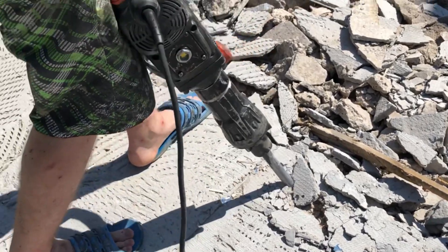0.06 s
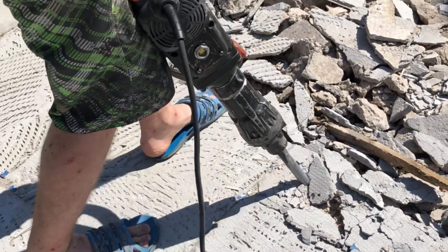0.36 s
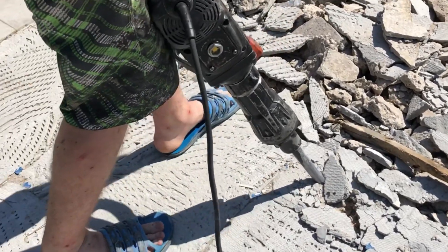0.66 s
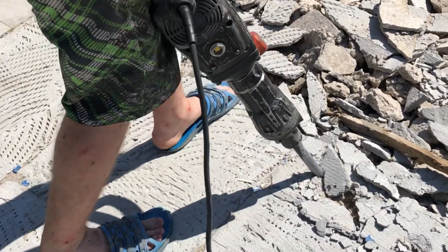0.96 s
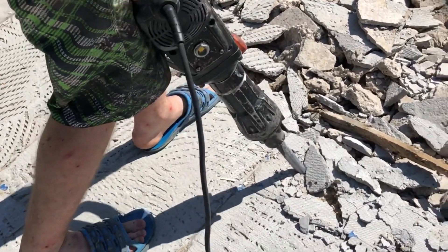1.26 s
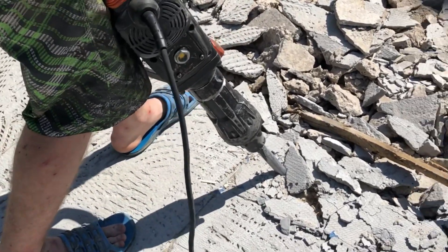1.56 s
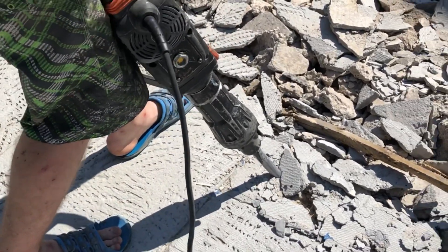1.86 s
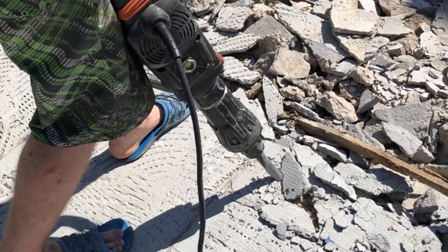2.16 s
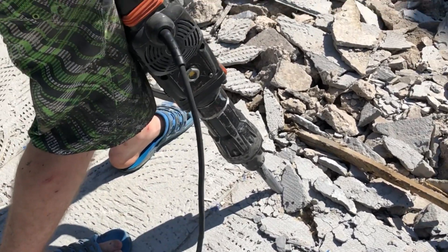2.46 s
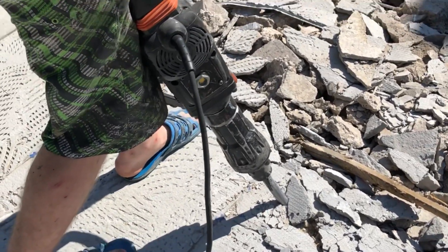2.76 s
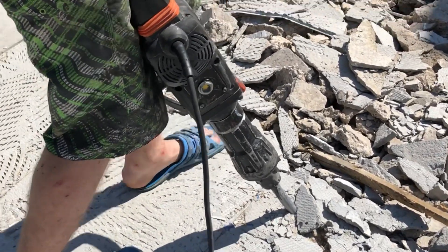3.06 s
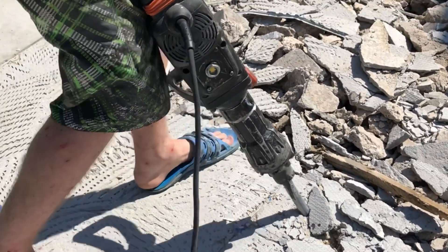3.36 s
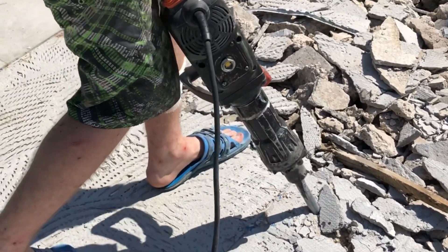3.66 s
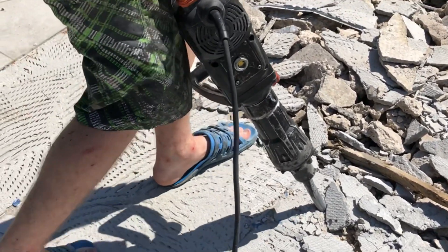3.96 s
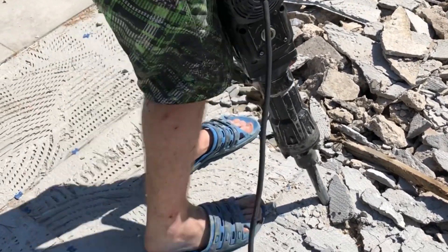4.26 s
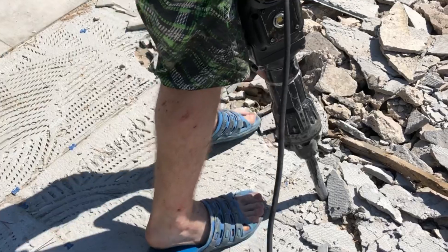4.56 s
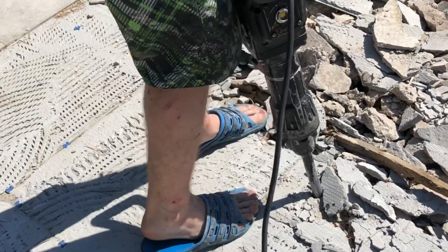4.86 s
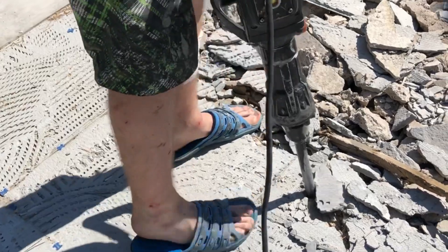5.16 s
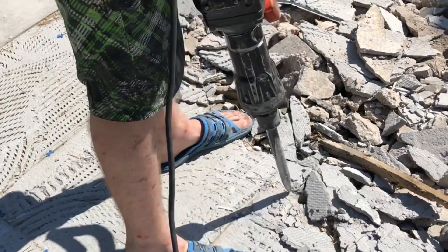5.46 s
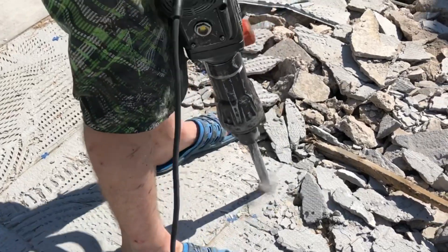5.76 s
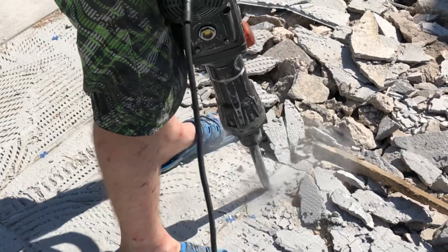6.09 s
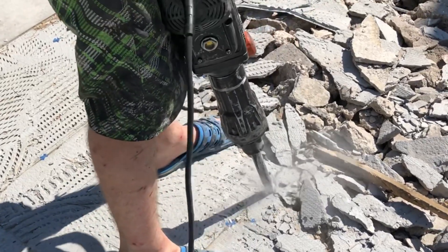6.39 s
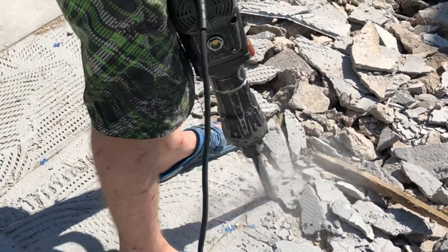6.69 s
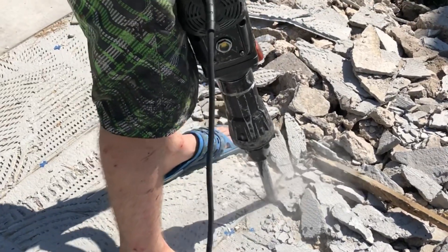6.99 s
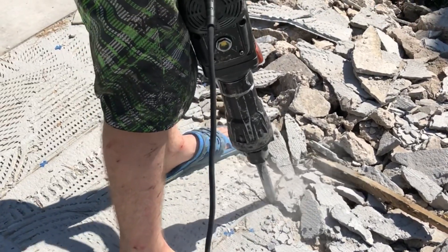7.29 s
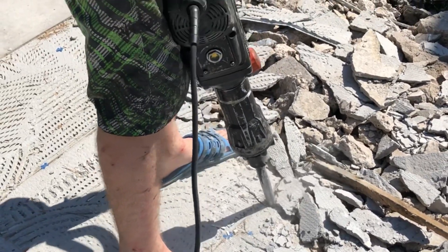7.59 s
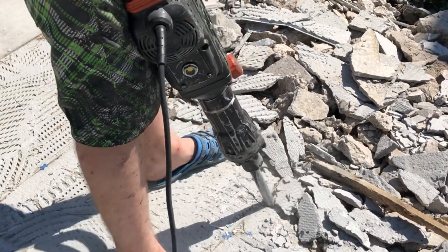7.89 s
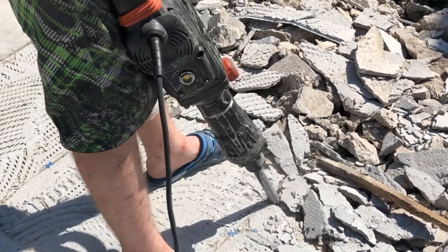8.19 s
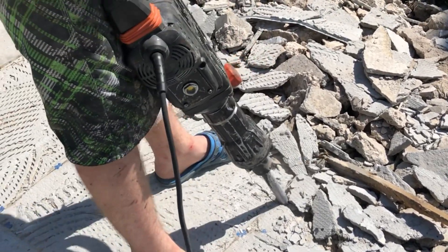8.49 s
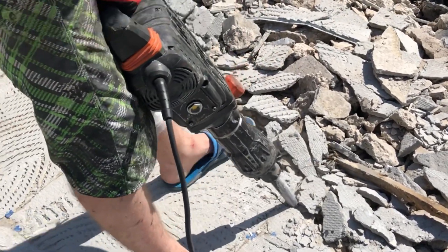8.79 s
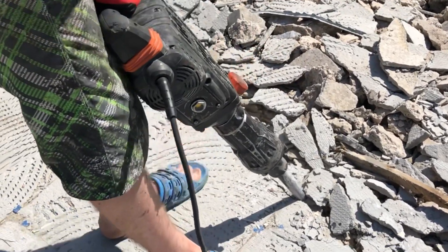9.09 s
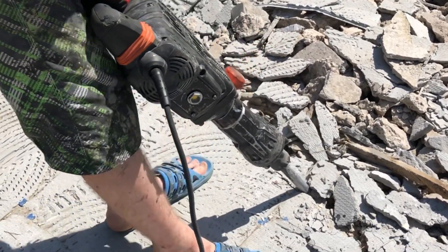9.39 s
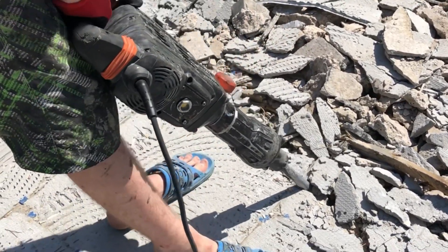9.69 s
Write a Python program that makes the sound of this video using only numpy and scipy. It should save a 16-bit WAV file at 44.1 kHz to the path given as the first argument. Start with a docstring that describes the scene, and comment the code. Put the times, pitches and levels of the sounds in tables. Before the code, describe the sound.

An electric demolition hammer pounds concrete close by, briefly runs free with a whirring motor, then resumes its rapid hammering.

```python
"""An electric demolition hammer chisels a concrete slab outdoors, close by. From the start, each blow
cracks on the concrete and thuds through tool and slab; the steel chisel rings when it rattles loose.
After about 4 seconds the tool is lifted and runs free, its fan roaring and its gears whining.
Near 5.7 seconds it starts on a new spot, skids, then bites in with a dry clack at each blow.
Towards the end a piece of concrete works free and the knocking turns hollow."""
import sys
import numpy as np
from scipy import signal
from scipy.fft import rfft, irfft, next_fast_len
from scipy.io import wavfile
from scipy.ndimage import uniform_filter1d, map_coordinates

SR = 44100
rng = np.random.default_rng(int(sys.argv[2]) if len(sys.argv) > 2 else 0)


def unload_wav(signal):
    """Save mono or channel-first audio to the path in sys.argv[1] as 16-bit WAV at rate SR, clipped to [-1, 1]."""
    wavfile.write(
        sys.argv[1],
        SR,
        np.round(np.clip(np.atleast_2d(signal).T, -1, 1) * 32767).astype(np.int16),
    )


N = 438354

# pace of the two spells of hammering, which sags under load: (time [s], pace [blows/s])
FIRST_SPELL = [(0.008, 24.708), (0.45, 23.078), (1.04, 22.991), (1.22, 24.499), (2.29, 23.901),
               (2.54, 24.361), (3.42, 23.408), (3.76, 27.247), (4.1567, 27.559)]
SECOND_SPELL = [(5.6837, 32.854), (6.03, 26.654), (6.56, 27.784), (6.68, 25.918), (7.09, 24.988),
                (7.39, 27.352), (7.91, 28.604), (8.61, 28.868), (9.09, 28.187), (9.9416, 28.82)]
LIFT_S, RESTART_S = FIRST_SPELL[-1][0], SECOND_SPELL[0][0]
# how the tool is held: (time [s], chisel depth [0 on top, 1 wedged in], weight leant on it [dB])
STANCE = [(0, 0, 0.5), (1.2, 0.046, -0.5), (2.7, 0.092, 2.5), (3.25, 0.036, 2.5), (3.45, 0.56, 1),
          (4.16, .55, -1), (5.68, 0.59, 4.5), (5.86, 0.16, -7), (6.1, 0.21, -2.5), (6.95, 0.17, -1.5),
          (7.3, 0.77, -1.5), (9.94, 0.7, 5)]
# tone colour of the crack with the chisel on top of the slab: (pitch [Hz], level [dB])
CRACK_ON_TOP = [(200, -16), (900, -5.5), (1400, -5), (2000, -9), (2800, -2.5), (4000, -6.5), (5200, -1.5),
                (6800, -2.5), (8100, 4), (10000, -4.5), (11300, -6.5), (12400, -2.5), (15700, -19.5)]
# tone colour of the low thump as the tool kicks back: (pitch [Hz], level [dB])
RECOIL_COLOUR = [(25, -10), (55, -5.5), (78, 4.5), (100, 3), (135, -2.5), (180, 3.5), (215, -1.5),
                 (260, -21), (600, -53)]
# strength of the crack: (on top [dB], added by wedging [dB], per dB of lean [dB], added in spell two [dB])
CRACK_STRENGTH = (-19.5, -7.5, 0.42, -0.5)


def concrete_cracks(times, low_cut_hz=330):
    """Steel hits concrete: a bright crack while the chisel is on top, shorter and fuller once wedged."""
    # tone colour of the crack with the chisel wedged in: (pitch [Hz], level [dB])
    crack_wedged = [(200, 2.5), (750, 9), (1300, 9), (1900, 5.5), (2600, 10), (3500, 6), (4300, 9),
                    (7500, 6.5), (9000, 2.5), (10300, -2.5), (12200, -1.5), (15700, -12)]
    depth = chisel_depth(times)
    on_top = crack(times, CRACK_ON_TOP, np.sqrt(1 - depth), gain_db=19.5, fade_s=.031,
                   tail_db=-13, tail_s=.18, attack_s=.0012, likeness=.44)
    wedged = crack(times, crack_wedged, np.sqrt(depth), gain_db=22.5, fade_s=.016,
                   tail_db=-30, tail_s=.12, attack_s=.0018, likeness=.7)
    bass_cut = signal.butter(2, low_cut_hz, "highpass", fs=SR, output="sos")
    return signal.sosfilt(bass_cut, on_top + wedged)


def crack(times, colour, share, gain_db, fade_s, tail_db, tail_s, attack_s, likeness, lead_s=.00021):
    """A sharp burst of noise at each blow, then a short tail of grit and ground echoes."""
    t = np.arange(SR // 8) / SR
    burst_s = fade_s * np.exp(.081 * rng.standard_normal((len(times), 1)))
    rise = 1 - np.exp(-(t / attack_s) ** 2)
    shape = rise * np.hypot(fade(t, burst_s), amp(tail_db) * fade(t, tail_s))
    # the crater changes only slowly, so each crack resembles the one before
    noise = rng.standard_normal(shape.shape)
    grit = signal.lfilter([np.sqrt(1 - likeness ** 2)], [1, -likeness], noise, axis=0)
    strength = share * amp(blow_db(times, CRACK_STRENGTH) + gain_db + rng.standard_normal(len(times)))
    bursts = placed(times - lead_s, strength[:, None] * shape * grit)
    return coloured(bursts, colour, lag_cycles=1.3)


def thud(times, recoil_gain_db=50, knock_gain_db=48, rubble_db=-36, rubble_s=.21):
    """Each blow shoves tool and slab. The slab bends, so low notes arrive late; loose rubble shakes."""
    # the slab's knock with the chisel on top, wedged in, and on a freed piece: (pitch [Hz], level [dB])
    knock_on_top = [(120, -15.5), (235, -11.5), (285, 0.5), (400, 1), (510, 6.5), (640, -6), (900, -17),
                    (2500, -47)]
    knock_wedged = [(120, -35.5), (240, -9), (290, -2), (370, -7), (490, 1), (600, -2.5), (730, 3),
                    (1400, -16), (3500, -27)]
    knock_hollow = [(150, -25), (250, -4.5), (340, 1.5), (520, 0.5), (660, -9.5), (1200, -26.5)]
    # strength of the tool's kick and the slab's knock:
    # (on top [dB], added by wedging [dB], per dB of lean [dB], added in spell two [dB])
    recoil_strength = (-29, -2, 1, -1)
    knock_strength = (-31.5, 3, 0.6, 3)
    # digging in solid concrete: (start [s], end [s], time the piece then takes to work free [s])
    solid_stretch = (7.1, 8.67, 0.88)
    solid_s, break_s, loosen_s = solid_stretch
    t = np.arange(SR // 10) / SR
    freed = np.where(times < solid_s, 1, np.clip((times - break_s) / loosen_s, 0, 1))[:, None]
    depth = chisel_depth(times)[:, None]
    push = amp(rubble_db) * fade(t, rubble_s) * rng.standard_normal((len(times), len(t)))
    push[:, 0] += 1  # the blow itself, ahead of the rubble
    recoils = push * amp(blow_db(times, recoil_strength))[:, None]
    recoils *= amp(-4 * freed * depth)  # a freed piece pushes back less
    knocks = push * amp(blow_db(times, knock_strength))[:, None]
    tool = coloured(placed(times, recoils), RECOIL_COLOUR, lag_cycles=1.082)
    blend = [(1 - depth, knock_on_top),
             (amp(2) * depth * (1 - freed), knock_wedged),
             (amp(1) * depth * freed, knock_hollow)]
    slab = sum(coloured(placed(times, knocks * share), colour, lag_cycles=.93) for share, colour in blend)
    return amp(recoil_gain_db) * tool + amp(knock_gain_db) * slab


def chisel_clack(times, fade_s=.021, pitch_spread=.011):
    """Clamped in the concrete, the chisel gives two short, dead notes at each blow."""
    # the notes as it works deeper: (time [s], lower pitch [Hz], upper pitch [Hz], level [dB])
    clack_notes = [(4.1, 2800, 4900, -2), (7.3, 2650, 4300, -6), (7.9, 2620, 4300, -1.5),
                   (8.85, 2550, 4650, 1), (9.9, 2920, 5680, 1)]
    # boost of each note: (lower [dB], upper [dB])
    note_gains = (16.5, 13)
    t = np.arange(SR // 25) / SR
    *pitches, level_db = curves(clack_notes, times)
    clack_db = blow_db(times, CRACK_STRENGTH) + level_db
    notes = 0
    for hz, gain_db in zip(pitches, note_gains):
        detune, size = rng.standard_normal((2, len(times)))
        strength = chisel_depth(times) * amp(clack_db + gain_db + 2 * size)
        note_hz = hz * (1 + pitch_spread * detune)
        notes = notes + strength[:, None] * np.sin(2 * np.pi * note_hz[:, None] * t)
    return placed(times, notes * fade(t, fade_s))


def chisel_ring(times, on_top_db=-24.5, wedged_loss_db=24, bounce_s=.012, bounce_spread_s=.013):
    """The chisel rings at the blow and again as it bounces against its holder; wedging muffles it."""
    ring_db = on_top_db - wedged_loss_db * chisel_depth(times) + skid_db(times)
    struck = steel_notes(times, ring_db, ring_db - 16, attack_s=.00037)
    bounces = times + bounce_s + bounce_spread_s * rng.random(len(times))
    bounce_db = ring_db + 3.8 * rng.standard_normal(len(times))
    return struck + steel_notes(bounces, bounce_db, bounce_db - 2.5, attack_s=.00045)


def chisel_jangle(times, first_s=.005, gap_s=.009, tick_db=-5, tick_s=.0061, hits_per_blow=3):
    """In short bouts the chisel flies loose after each blow and hits its holder, ticking and ringing."""
    # when it is loose: (start [s], end [s], level of high notes [dB], level of low notes [dB])
    bouts = [(.27, .72, -17.5, -22.5), (.77, .84, -12, -22), (.9, .96, -14.5, -14.5),
             (2.21, 2.25, -27, -20), (3.22, 3.28, -25, -17), (5.74, 5.9, -14.5, -17.5),
             (6.05, 6.15, -13, -19.5), (6.23, 6.27, -17, -25), (6.52, 6.69, -16, -21),
             (6.78, 7.06, -14.5, -32)]
    hits = [(blow_s + first_s + gap_s * k, high, low)
            for start, end, high, low in bouts
            for blow_s in times[(times > start) & (times < end)]
            for k in range(hits_per_blow)]
    hit_times, high_db, low_db = np.transpose(hits)
    hit_times = hit_times + gap_s * rng.random(len(hits))
    t = np.arange(SR // 50) / SR
    ticks = amp(high_db[:, None] + tick_db) * fade(t, tick_s) * rng.standard_normal((len(hits), len(t)))
    ringing = steel_notes(hit_times, high_db, low_db, attack_s=.0022, bending_db=-2, scatter_db=5)
    return ringing + coloured(placed(hit_times, ticks), CRACK_ON_TOP)


def steel_notes(times, high_db, low_db, attack_s, bending_db=0, scatter_db=5.5, high_above_hz=6000):
    """Every hit sets the chisel's own notes ringing, each time in a new mix."""
    # the notes of the steel: (pitch [Hz], level [dB], time to fade by 60 dB [s])
    chisel_notes = [(2680, -9, .08), (2777, -7, .08), (4881, -2, .11), (5052, -6, .09), (7440, -2, .09),
                    (7530, -8, .07), (7688, 0, .1), (10515, -15, .1), (13880, -22, .1), (15734, -22, .13)]
    t = np.arange(SR // 8) / SR
    hz, level_db, fade_s = np.transpose(chisel_notes)[:, :, None]
    level_db = level_db + bending_db * (hz < 4000)  # the lowest notes come from the steel bending
    rise = 1 - np.exp(-t / attack_s)
    notes = amp(level_db) * rise * fade(t, fade_s) * np.exp(2j * np.pi * hz * t)
    hit_db = np.where(hz.T > high_above_hz, high_db[:, None], low_db[:, None])
    strengths = amp(hit_db + scatter_db * rng.standard_normal(hit_db.shape))
    phases = np.exp(2j * np.pi * rng.random(hit_db.shape))
    shift_hz = 15 * rng.standard_normal((len(times), 1))  # the holder detunes each hit a little
    rings = (strengths * phases) @ notes * np.exp(2j * np.pi * shift_hz * t)
    return placed(times, rings.real)


def striker_chirp(times, hz=1432, lead_s=.0084, swell_s=.0048, gain_db=-6, wedged_db=-34, scrape_db=-8):
    """The mechanism sings and scrapes as the striker flies forward, just ahead of each blow."""
    t = np.arange(SR // 25) / SR
    chirp_db = gain_db + wedged_db * chisel_depth(times)
    detune, scatter_db = rng.standard_normal((2, len(times), 1))
    shape = amp(chirp_db[:, None] + scatter_db) * (t / swell_s) ** 2 * np.exp(-2 * t / swell_s + 1)
    tone = placed(times - lead_s, shape * np.sin(2 * np.pi * hz * (1 + .02 * detune) * t))
    scrape = placed(times - lead_s, shape * rng.standard_normal(shape.shape))
    return tone + amp(scrape_db) * coloured(scrape, CRACK_ON_TOP)


def blow_times(jitter_s=.0003):
    """The piston throws the striker once per turn of the crank, never quite evenly."""
    times = []
    for spell in (FIRST_SPELL, SECOND_SPELL):
        t = np.arange(spell[0][0], spell[-1][0], 1 / SR)
        crank_turns = np.cumsum(curves(spell, t)[0]) / SR
        times.extend(np.interp(np.arange(crank_turns[-1]), crank_turns, t))
    return np.array(times) + jitter_s * rng.standard_normal(len(times))


def blow_db(times, strength):
    """Level of one part of each blow, set by chisel depth, weight on the tool, the spot and any skid."""
    top_db, wedged_db, lean_share, new_spot_db = strength
    lean_db = curves(STANCE, times)[1]
    held_db = top_db + wedged_db * chisel_depth(times) + lean_share * lean_db
    return held_db + new_spot_db * (times > LIFT_S) + skid_db(times)


def chisel_depth(times):
    """How deep the chisel sits: 0 is skating on top, 1 is wedged in."""
    return np.clip(curves(STANCE, times)[0], 0, 1)


def skid_db(times):
    """When the chisel skids, the blows glance off and weaken."""
    # the skids: (start [s], end [s], change in level [dB])
    skids = [(5.93, 6.04, -8), (6.15, 6.19, -9), (6.7, 6.74, -12)]
    return sum(db * ((times > start) & (times < end)) for start, end, db in skids)


def motor(free_speed_hz=644, blades_db=-13, whistle_boost_db=17, gears_db=-19.5, idle_boost_db=10):
    """The fan roars and its blades whistle, louder with speed; the gears sing most without load."""
    # tones of the fan blades and of the gear teeth: (pitch [times the shaft speed], level [dB])
    blade_tones = [(1, -16), (5, -2), (10, 1.5), (15, -12), (20, -24)]
    gear_tones = [(8, 1), (12, -2), (13, -20), (14, -19), (16, -14.5), (24, -15)]
    # the roar and whistle swell in level while the tool runs free, then drop when hammering resumes: # (time
    # [s], level [dB])
    fan_swell = [(4.3, 0.5), (4.9, 5), (5.07, 7), (5.21, 6.5), (5.34, 7), (5.5, 6), (5.68, 5.5), (5.86, -2),
                 (7.5, 0), (8.5, .3), (9.05, 2.5), (9.7, 1)]
    t = np.arange(N) / SR
    speed = shaft_speed(t, free_speed_hz)
    swell_db, = curves(fan_swell, t)
    swell = np.clip(swell_db / swell_db.max(), 0, 1)
    motor_db = -20.5 + 49.5 * np.log10(speed / free_speed_hz)
    idling = uniform_filter1d(1. * ((t > LIFT_S) & (t < RESTART_S)), size=SR // 5)
    turns = np.cumsum(speed * (1 + .0007 * wobble(40))) / SR
    blades = amp(motor_db + blades_db + whistle_boost_db * swell ** 2) * whine(turns, blade_tones)
    gears = amp(motor_db + gears_db + idle_boost_db * idling) * whine(turns, gear_tones)
    return fan(motor_db + swell_db, swell_db) + blades + gears


def shaft_speed(t, free_speed_hz, turns_per_blow=20.4, halfway_s=.27):
    """Turns per second: geared to the blows under load, racing towards free speed once lifted."""
    loaded = turns_per_blow * curves(list(FIRST_SPELL) + list(SECOND_SPELL), t)[0]
    at_lift = turns_per_blow * FIRST_SPELL[-1][1]
    lifted_s = np.clip(t, LIFT_S, RESTART_S) - LIFT_S
    racing = at_lift + (free_speed_hz - at_lift) * lifted_s / (lifted_s + halfway_s)
    return np.where((t > LIFT_S) & (t < RESTART_S), racing, np.minimum(loaded, racing))


def whine(turns, tones, waver_db=1.2, flutter_db=1.8):
    """Tones that follow the spinning shaft, each wavering and fluttering in level."""
    sound = 0
    for multiple, db in tones:
        level = amp(db + waver_db * wobble(3.8) + flutter_db * wobble(45))
        sound = sound + level * np.sin(2 * np.pi * round(multiple) * turns)
    return sound


def fan(fan_db, swell_db, hiss_hz=4500, hiss_growth=.51):
    """Cooling air rushes through the tool, sounding brighter as it swells."""
    # tone colour of the rushing air: (pitch [Hz], level [dB])
    air_colour = [(60, -32), (180, -19), (330, -10.5), (540, -16.5), (750, -9.5), (1100, -1.5), (1550, 0),
                  (2100, -5.5), (4000, -6.5), (6200, -9), (7000, -11.5), (12800, -14.5), (15500, -27.5)]
    rush = unit(coloured(rng.standard_normal(N), air_colour))
    roar = signal.lfilter(*signal.butter(1, hiss_hz, fs=SR), rush)
    hiss = (rush - roar) * amp(hiss_growth * (swell_db - swell_db.max()))
    return (roar + hiss) * amp(fan_db + .87 * wobble(60))


def shudder(level_db=-39, swell_s=.46, clear_s=5.1, release_s=.06):
    """The idling tool shakes on its tip until it is clear of the slab."""
    t = np.arange(N) / SR
    shape = np.clip((t - LIFT_S) / swell_s, 0, 1) * np.clip((clear_s - t) / release_s, 0, 1)
    return amp(level_db) * shape * unit(coloured(rng.standard_normal(N), RECOIL_COLOUR))


def amp(db):
    """Turns decibels into a number to multiply a sound by."""
    return 10 ** (np.asarray(db) / 20)


def fade(t, fade_s):
    """A curve that starts at 1 and falls by 60 dB every fade_s seconds."""
    return amp(-60 * t / fade_s)


def unit(x):
    """Scales x to an average (rms) level of 1."""
    return x / np.sqrt(np.mean(x ** 2) + 1e-20)


def curves(rows, at):
    """Reads each column after the time column at the given times."""
    row_times, *columns = np.transpose(rows)
    return [np.interp(at, row_times, column) for column in columns]


def wobble(rate):
    """A smooth random curve through `rate` points a second."""
    return map_coordinates(rng.standard_normal(int(N * rate / SR) + 4), [np.arange(N) * rate / SR])


def coloured(x, colour, lag_cycles=0, size=8192):
    """Gives x a tone colour and delays each pitch by lag_cycles of its own cycles."""
    log_hz = np.log(np.fft.rfftfreq(size, 1 / SR) + 1)
    hz, db = np.transpose(colour)
    cepstrum = irfft(np.log(amp(np.interp(log_hz, np.log(hz), db))))
    # fold it so that the filter rings after a hit, not before
    cepstrum[1:size // 2] *= 2
    cepstrum[size // 2 + 1:] = 0
    response = irfft(np.exp(rfft(cepstrum) - 2j * np.pi * lag_cycles * log_hz))
    return signal.fftconvolve(x, response[:size // 2])[:N]


def placed(times, sounds):
    """Adds short sounds, one per row, into one track at their start times."""
    index = np.round(times * SR).astype(int)[:, None] + np.arange(sounds.shape[1])
    inside = (index >= 0) & (index < N)
    return np.bincount(index[inside], sounds[inside], N)


def scene():
    """One close hammer, the same in both channels."""
    times = blow_times()
    blows = thud(times) + concrete_cracks(times) + chisel_clack(times) + striker_chirp(times)
    ringing = chisel_ring(times) + chisel_jangle(times)
    hammer = blows + ringing + motor() + shudder()
    return np.array([hammer, hammer])


def record(dry, hardness=5, top_hz=15850):
    """Rounds off the loudest peaks and removes the very highest treble."""
    rounded = dry / (1 + np.abs(dry) ** hardness) ** (1 / hardness)
    size = next_fast_len(N + SR // 2)
    below_top = np.fft.rfftfreq(size, 1 / SR) < top_hz
    return irfft(rfft(rounded, size) * below_top, size)[:, :N]


dry = scene()
out = record(dry)
unload_wav(out)
```